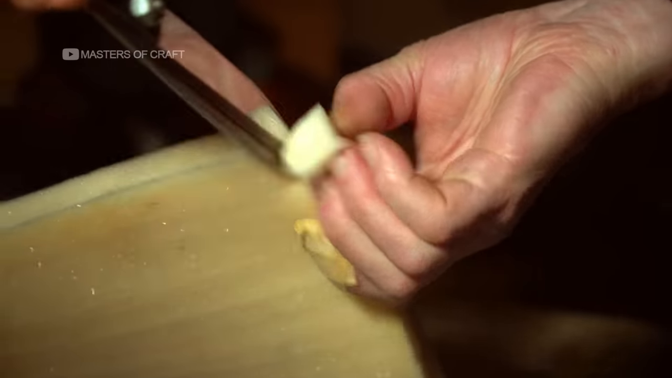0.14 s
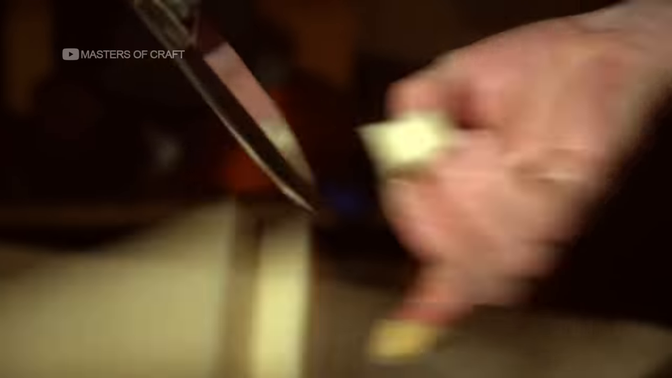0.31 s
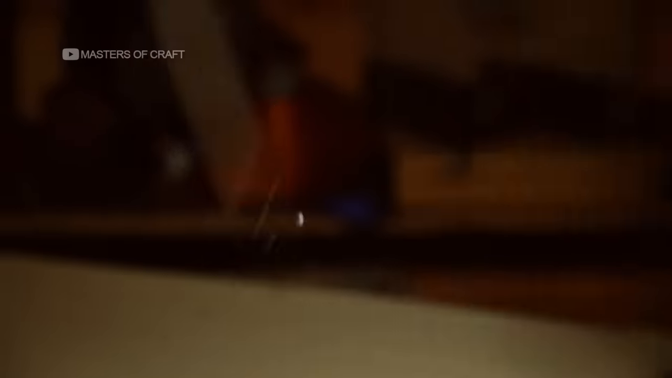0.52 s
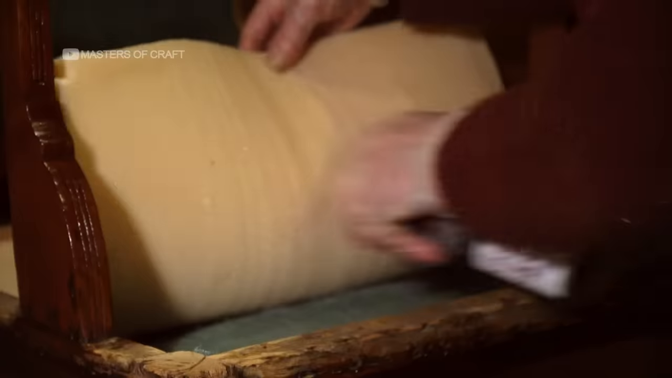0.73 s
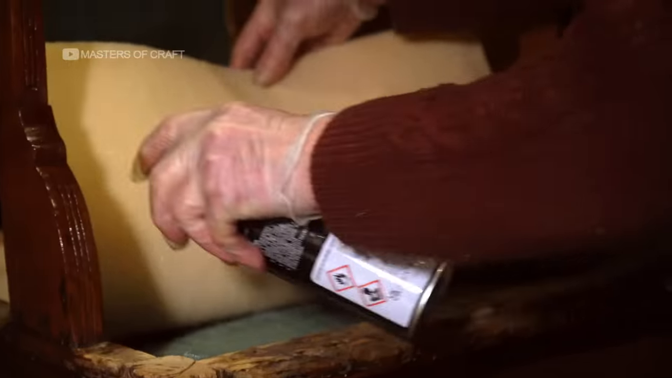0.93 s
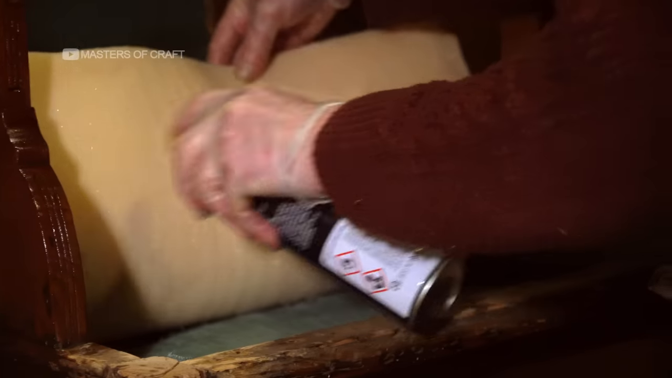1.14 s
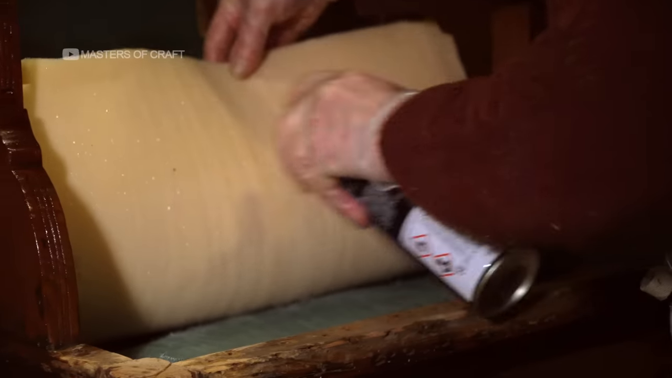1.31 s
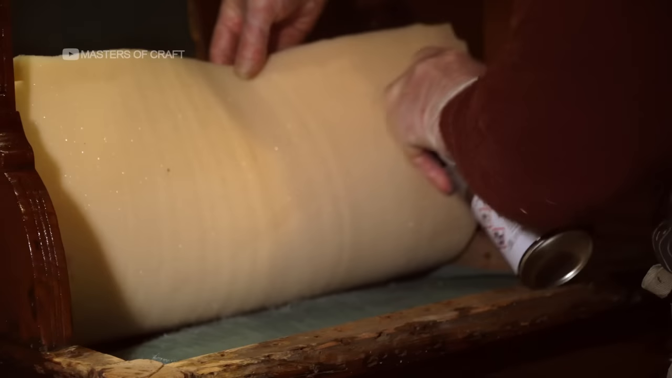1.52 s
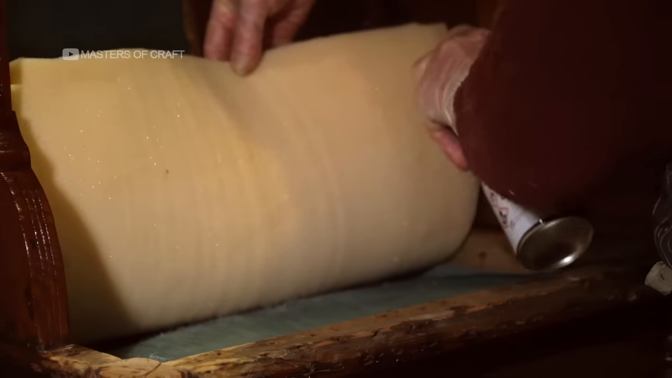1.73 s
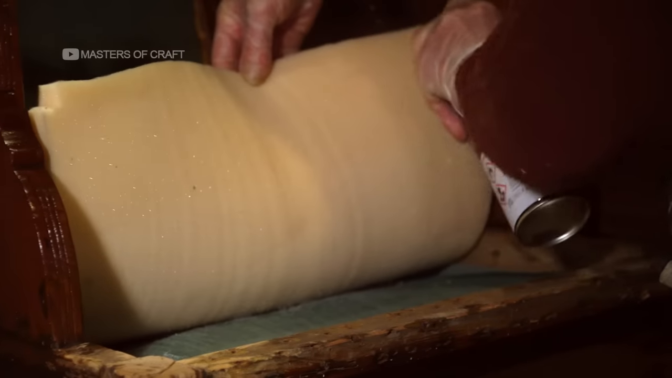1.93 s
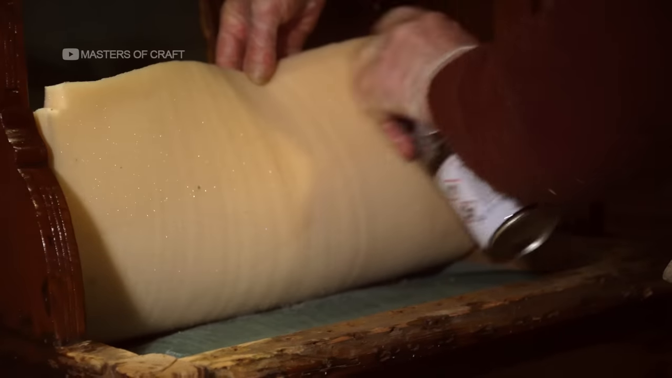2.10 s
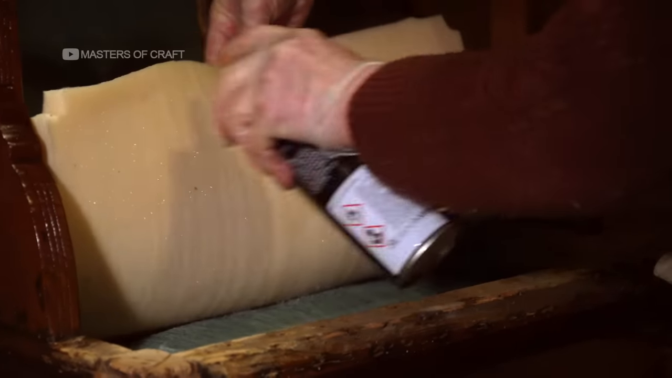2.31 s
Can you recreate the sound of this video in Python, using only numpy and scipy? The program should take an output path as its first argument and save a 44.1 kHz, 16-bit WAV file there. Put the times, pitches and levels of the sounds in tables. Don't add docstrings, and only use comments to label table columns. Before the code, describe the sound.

Aerosol can sprays foam in two bright, breathy hisses. Before them, steel shears scrape and snap shut; a low wooden knock falls between the sprays. Quiet workshop, close mono microphone, little reverberation.

```python
import sys
import numpy as np
from scipy import signal
from scipy.fft import rfft, irfft
from scipy.io import wavfile
from scipy.ndimage import uniform_filter1d, map_coordinates

SR = 44100
rng = np.random.default_rng(int(sys.argv[2]) if len(sys.argv) > 2 else 0)


def store_pcm(level_fs):
    pcm = np.round(np.clip(level_fs, -1, 1) * 32767).astype(np.int16)
    wavfile.write(sys.argv[1], SR, np.atleast_2d(pcm).T)


def decibels_to_gain(level_db):
    exponent = np.asarray(level_db, float) / 20
    return 10 ** exponent


N = 110250
T = np.arange(N) / SR


def unit(x):
    return x / np.sqrt(np.mean(x ** 2))


def curve(table, col=1):
    a = np.array(table, float)
    return np.interp(T, a[:, 0], a[:, col])


def noise():
    return rng.standard_normal(N)


def grit(share, spread_db):
    return (rng.random(N) < share) * noise() * decibels_to_gain(spread_db * rng.exponential(size=N))


def walk(rate_hz):
    k = int(SR / rate_hz)
    steps = np.repeat(rng.standard_normal(N // k + 1), k)
    return unit(uniform_filter1d(uniform_filter1d(steps, k), k)[:N])


def colour(x, points):
    p = np.array(points, float)
    f = np.arange(N // 2 + 1) * SR / N + 1
    db = np.interp(np.log(f), np.log(p[:, 0]), p[:, 1])
    db = db - 18 * np.clip(np.log2(p[0, 0] / f), 0, 9)
    return unit(irfft(rfft(x) * decibels_to_gain(db), N))


def band(x, hz, width_hz):
    return signal.lfilter(*signal.iirpeak(hz, hz / width_hz, fs=SR), x)


def narrow_noise(hz, width_hz):
    return unit(band(band(noise(), hz, width_hz), hz, width_hz))


def fade(start_s, t60_s):
    return (T >= start_s) * decibels_to_gain(-60 * np.clip(T - start_s, 0, 9) / t60_s)


def modes(pitches_hz, rings):
    return [(hz, *r) for hz, r in zip(pitches_hz, rings)]


def ring(partials, start_s, longest_s=9, rise_cycles=0.3):
    t = np.clip(T - start_s, 0, 9)
    out = np.zeros(N)
    for k, (hz, db, t60_s) in enumerate(partials):
        rise = 1 - np.exp(-t * hz / rise_cycles)
        decay = decibels_to_gain(db) * fade(start_s, min(t60_s, longest_s))
        out += (-1) ** k * decay * rise * np.sin(2 * np.pi * hz * t)
    return out


def echo(x, t60_s, damp_hz):
    tail = signal.lfilter(*signal.butter(1, damp_hz, fs=SR), noise()) * fade(0.0034, t60_s)
    return signal.fftconvolve(x, tail / np.sqrt(np.sum(tail ** 2)))[:N]


def spray():
    # (opens [s], shuts [s], start level [dB], end level [dB], opening slope [dB/s])
    sprays = [
        (0.933, 1.582, -47.5, -49.5, 1091),
        (1.806, 2.6, -50.5, -49, 700),
    ]
    # (time [s], level [dB], mirror lag [ms], low rush [dB], aim at microphone [dB/octave])
    sweep = [(.9, -1, 1.3, 0.5, 3.5), (1.07, 2, 1.03, -1, 1), (1.27, 2.5, 0.92, -2.5, 0.5),
             (1.45, 2, 1.14, -0.5, -0.5), (1.6, -1.5, 1.9, 3.5, 0), (1.8, 1.5, 1.7, 0, -1.5),
             (1.95, 0, 2, 1.5, 1), (2.08, 1.5, 1.23, -1.5, -0.5), (2.2, 1, 1.17, 2, 1.5),
             (2.35, 1, 1.2, 0, 2.5), (2.5, 0.5, 1.3, 1, 4)]
    # (frequency [Hz], density [dB/Hz])
    jet_spectrum = [(1530, -38), (2600, -6.5), (3310, -2), (4720, -3), (5210, -4.5), (10500, -2.5),
                    (13500, -1), (14700, 0.5), (15800, -3.5)]
    # (frequency [Hz], density [dB/Hz])
    rush_spectrum = [(130, -58), (220, -13), (417, -6), (635, -8), (1190, -7.5), (2330, -4.5),
                     (2700, -13.5), (3510, -73), (5940, -120)]
    # (centre [Hz], width [Hz], depth [0-1])
    shadows = [(13600, 760, 0.5), (5500, 330, 0.14), (3000, 300, 0.07)]
    # (centre [Hz], width [Hz], first sweep [dB], second sweep [dB])
    can_modes = [(2010, 450, -18.5, -21.5), (2360, 150, -16.5, -17), (11720, 540, -19, -22.5),
                 (14800, 1100, -16.5, -23), (9100, 700, -26, -22), (6500, 600, -22, -24)]
    # (time [s], half length [s], centre [Hz])
    hollows = [(1.97, .09, 450), (2.2, .08, 430), (1.9, .08, 1030), (2.15, .08, 720), (2.42, .09, 880),
               (2.4, .14, 1650), (1.26, .1, 2150), (2.1, .08, 4300), (1.04, .12, 15050), (1.27, .11, 14350),
               (1.05, .13, 10400), (.99, .07, 11800), (1.22, .12, 11300), (1.13, .12, 8500),
               (1.15, .12, 4300), (1.25, .13, 6700), (1.3, .2, 1450), (1.86, .09, 2350), (2.12, .12, 2120),
               (2.48, .1, 1900), (2.28, .09, 7050), (2.42, .16, 14900), (1.83, .04, 4900),
               (2.46, .12, 10400)]
    hollow_db = [-12.5, -13.5, -12, -18, -16.5, -15.5, -15, -13, -7, -9, -8.5, -8, -12.5, -13, -16, -19,
                 -18, -16, -14, -12, -16, -8, -14, -20]
    shut_db_per_s = 410

    jet = np.zeros(N)
    for hz in 2900 * 1.366 ** np.arange(6):
        flicker_db = 0.67 * walk(20) + 0.13 * walk(4.8)
        aim_db = curve(sweep, col=4) * np.log2(hz / 6000)
        jet += band(colour(noise(), jet_spectrum), hz, hz / 2) * decibels_to_gain(flicker_db + aim_db)
    jet = unit(jet) + decibels_to_gain(-15) * colour(grit(0.027, 3), jet_spectrum)
    for hz, width_hz, depth in shadows:
        jet = jet - depth * band(jet, hz, width_hz)

    rush = decibels_to_gain(-9.5 + curve(sweep, col=3) + 0.8 * walk(12)) * colour(noise(), rush_spectrum)

    can = np.zeros(N)
    for hz, width_hz, first_db, second_db in can_modes:
        db = np.where(T < sprays[1][0] - .1, first_db, second_db)
        can += decibels_to_gain(db + 1.9 * walk(4.74) + 0.84 * walk(25)) * narrow_noise(hz, width_hz)

    passing = np.zeros(N)
    for (s, half_s, hz), db in zip(hollows, hollow_db):
        swell = decibels_to_gain(db) * np.exp(-((T - s) / half_s) ** 2)
        passing += swell * narrow_noise(hz, min(hz / 7, 1000))

    gas = jet + rush + can + passing
    mirror_s = curve(sweep, col=2) / 1000
    gas = gas + decibels_to_gain(-21.5) * map_coordinates(gas, [(T - mirror_s) * SR], mode="mirror")

    valve = np.zeros(N)
    for open_s, shut_s, start_db, end_db, open_db_per_s in sprays:
        db = np.interp(T, [open_s, shut_s], [start_db, end_db])
        db = db - open_db_per_s * np.clip(open_s - T, 0, 9)
        valve += decibels_to_gain(db - shut_db_per_s * np.clip(T - shut_s, 0, 9))
    return unit(gas) * valve * decibels_to_gain(curve(sweep))


def shears():
    blade_hz = [2126, 3532, 3640, 4954, 5648, 6317, 7163, 7938, 8289, 8830, 9657, 10430, 10809, 12391]
    # (level [dB], t60 [s])
    blade_ring = [(-7, 0.14), (-7, .08), (-11.5, .06), (2, .12), (-4, .06), (-3, 0.092), (-6, .1),
                  (-4, .11), (-3, .09), (-3, .12), (-5.5, .1), (-7, .07), (-3.5, 0.079), (-2, .08)]
    pivot_db = [-8.5, -3.5, -5.5, 1.5, -12.5, -10, -11, -11, -12.5, -12.5, -10, -12, -10.5, -18]
    tip_db = [-9, -2, -1.5, -4.5, -14.5, -11, -1.5, -8, -9, -5, -7, -6, -8.5, -8]
    # (time [s], level [dB])
    slide = [(.09, -113), (.1, -72), (.118, -99), (.127, -68), (.15, -77), (.168, -58), (.19, -53),
             (.205, -42), (.21, -87.5)]
    # (time [s], level [dB], frequency [Hz])
    edge_catches = [(.0968, -72, 3500), (.1247, -67, 2120), (0.107, -74, 9650), (.134, -68.5, 6500),
                    (0.1663, -53.5, 3610), (.1756, -49, 5030), (.199, -52, 3560)]
    # (frequency [Hz], level [dB], t60 [s])
    handles = [(85.06, -57.5, 0.062), (235.4, -50.5, .04), (330.7, -46, 0.04), (438.5, -52, 0.049),
               (770, -53.5, 0.018), (1160, -47.5, .03), (1603, -46.5, 0.039), (12960, -30.5, .03)]
    # (frequency [Hz], density [dB/Hz])
    crack_spectrum = [(88, -44.5), (150, -15), (1120, -28.5), (2120, -3), (2790, -25), (3520, 6),
                      (4280, -10.5), (4910, -4), (15800, -3.5)]
    # (frequency [Hz], density [dB/Hz])
    tail_spectrum = [(240, -47), (400, -13.5), (1550, -18.5), (2070, -7.5), (2650, -18), (4830, -2.5),
                     (5220, -5.5), (12000, -3.5), (15800, -20)]
    snap_s, tips_s = .2056, .182

    scrape = grit(.15, 1.2)
    travel = np.clip((T - tips_s) / .012 + .5, 0, 1)
    sliding = (0.28 + 0.27 * travel) * unit(band(scrape, 8500, 8000))
    for hz, a_db, b_db in zip(blade_hz, pivot_db, tip_db):
        drive_db = a_db + (b_db - a_db) * travel + 2.5 * walk(110)
        sliding += decibels_to_gain(drive_db) * unit(band(scrape, hz, 260))
    sliding = unit(sliding) * decibels_to_gain(curve(slide))

    catches = np.zeros(N)
    for s, db, hz in edge_catches:
        catches += ring([(hz, db, .04)], s) + decibels_to_gain(db - 6.5) * fade(s, .006) * noise()

    blade_modes = modes(blade_hz, blade_ring)
    rings = sum(ring([m], snap_s) * decibels_to_gain(3.5 * walk(150)) for m in blade_modes)
    rings = decibels_to_gain(-40.5) * rings + decibels_to_gain(-22) * ring(blade_modes, snap_s, longest_s=0.028)

    onset = np.clip((T - snap_s) / 0.00026, 0, 1)
    crack = decibels_to_gain(-19) * fade(snap_s, 0.021) * colour(noise(), crack_spectrum)
    tail = decibels_to_gain(-34) * fade(snap_s, 0.14) * colour(noise(), tail_spectrum)
    return sliding + catches + rings + ring(handles, snap_s) + onset * (crack + tail)


def frame():
    # (time [s], level [dB], contact [ms])
    hits = [
        (1.525, -36, 0.53),
        (1.549, -48, 1.8),
        (1.6, -58, 1.2),
        (1.627, -62, 1.5),
    ]
    wood_hz = [105, 146, 178, 256, 293, 320, 361, 404, 466, 560, 950, 1300]
    # (level [dB], t60 [s])
    wood_ring = [(-22, .2), (-20, .3), (-15, .2), (-9, .13), (3, .14), (-12, .1), (-16, .15), (-14, .15),
                 (-12, .18), (-13, .15), (-17, .08), (-21, .08)]
    # (time [s], frequency [Hz], level [dB], t60 [s])
    bounces = [(1.532, 76, -46, 0.22), (1.558, 78, -47, 0.18), (1.632, 70, -62, 0.87), (1.8, 73, -62, 0.83),
               (1.555, 117, -60, .3), (1.565, 146, -48, 0.36), (1.545, 190, -49, 0.32),
               (1.598, 248, -48.5, 0.26), (1.65, 225, -61, .3)]
    rise_cycles = 0.89

    wood_modes = modes(wood_hz, wood_ring)
    knocks = np.zeros(N)
    for s, db, contact_ms in hits:
        wood = ring(wood_modes, s, rise_cycles=rise_cycles)
        knocks += decibels_to_gain(db) * uniform_filter1d(wood, int(contact_ms * SR / 1000))
    for s, *mode in bounces:
        knocks += ring([mode], s, rise_cycles=rise_cycles)

    rattle = decibels_to_gain(-57.0) * unit(band(grit(0.25, 1), 320, 470)) * fade(hits[0][0], 0.74)
    thud = decibels_to_gain(-48.5) * ring([(126, 0, 0.078), (52, -6, .3)], 1.035, rise_cycles=0.18)
    return knocks + rattle + decibels_to_gain(-25) * echo(knocks, .3, 2100) + thud


def handling():
    tick_s = [.289, .33, .513, .714, .78, 1.658, 2.075]
    # (level [dB], centre [Hz], width [Hz])
    tick_bands = [(-57, 2000, 2300), (-69.5, 1510, 500), (-64, 590, 1400), (-62, 1800, 4100),
                  (-72, 2300, 4000), (-57.5, 910, 630), (-44.5, 650, 860)]
    # (time [s], level [dB])
    rustle_level = [(0, -79.5), (.15, -78), (.33, -76), (.4, -75), (.5, -70.5), (.58, -80), (.71, -76),
                    (.8, -80.5), (.9, -88)]
    # (time [s], pitch [Hz], level [dB])
    squeak_path = [
        (.57, 4300, -95),
        (.6, 4100, -81),
        (.66, 3550, -80),
        (.7, 3200, -84),
        (.72, 3100, -95),
    ]

    ticks = np.zeros(N)
    for s, (db, hz, width_hz) in zip(tick_s, tick_bands):
        attack = np.clip((T - s) / 0.0011, 0, 1)
        ticks += decibels_to_gain(db) * narrow_noise(hz, width_hz) * fade(s, 0.028) * attack

    fibres = unit(band(band(grit(.2, 1.2), 700, 1100), 700, 1500))
    rustle = fibres * decibels_to_gain(curve(rustle_level) + 2 * walk(27)) * (T < .95)

    pitch_hz = curve(squeak_path) * (1 + .06 * walk(500))
    squeak = np.sin(2 * np.pi * np.cumsum(pitch_hz) / SR)
    squeak = squeak * decibels_to_gain(curve(squeak_path, col=2) + 2.5 * walk(80))
    return ticks + rustle + squeak


def room():
    # (frequency [Hz], density [dB/Hz])
    tone_spectrum = [(8.8, -40), (15, -4), (103, -7.5), (173, -13.5), (403, -19), (624, -24), (1290, -29.5),
                     (1410, -33), (15800, -31.5)]
    # (start [s], end [s])
    hum_s = (.42, .72)
    # (time [s], level [dB])
    rumble = [(0.0, -52), (0.08, -68), (0.33, -53), (0.9, -68), (0.97, -59.5), (1.38, -68.5), (1.64, -58.5),
              (1.77, -67.5), (2.32, -59), (2.5, -67)]

    louder_db = 3.5 * (T < .722) * np.clip(T / 0.21, 0, 1)
    tone = colour(noise(), tone_spectrum) * decibels_to_gain(-71.5 + louder_db + .5 * walk(18))
    hum = decibels_to_gain(-76 + 2 * walk(11.3)) * np.sin(2 * np.pi * 190 * T) * (T > hum_s[0]) * (T < hum_s[1])
    sway_hz = 13 * (1 + 0.18 * walk(3.6))
    sway = np.sqrt(2) * np.sin(2 * np.pi * np.cumsum(sway_hz) / SR) * decibels_to_gain(curve(rumble))
    low = decibels_to_gain(-75 + 2 * walk(2.7)) * narrow_noise(30, 25)
    return tone + hum + sway + low


def scene():
    gas = spray()
    gas_room = decibels_to_gain(-10) * echo(gas, 0.16, 5870)
    mono = gas + gas_room + shears() + frame() + handling() + room()
    return np.array([mono, mono])


def unlink_bands(x):
    # (frame [number], low edge [Hz], high edge [Hz])
    patches = [(15, 11710, 13090), (16, 10340, 11710), (29, 4220, 5170), (43, 7580, 8960), (47, 4220, 5170),
               (47, 6200, 8270), (51, 6890, 8270), (61, 9650, 11020), (61, 13780, 15790), (80, 4650, 5680),
               (94, 10340, 11710), (94, 14470, 15790), (102, 13090, 15790)]
    hop, start = 1024, 18
    size = 2 * hop
    f = np.arange(hop + 1) * SR / size
    window = signal.windows.kaiser_bessel_derived(size, 4 * np.pi)
    y = x.copy()
    for k, lo_hz, hi_hz in patches:
        part = slice(start + (k - 1) * hop, start + (k + 1) * hop)
        inside = (f > lo_hz) & (f < hi_hz)
        old = irfft(rfft(x[:, part]) * inside, size)
        new = irfft(rfft(rng.standard_normal((2, size))) * inside, size)
        y[:, part] += window * (new * old.std() / new.std() - window * old)
    return y


def roll_off(x):
    return signal.sosfilt(signal.butter(12, 16990, fs=SR, output="sos"), x)


def record(dry):
    top_cut = signal.ellip(12, .2, 75, 15790, fs=SR, output="sos")
    mix = unlink_bands(signal.sosfilt(top_cut, dry))
    return roll_off(mix)


dry = scene()
out = record(dry)
store_pcm(out)
```